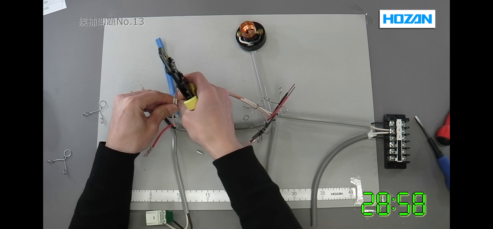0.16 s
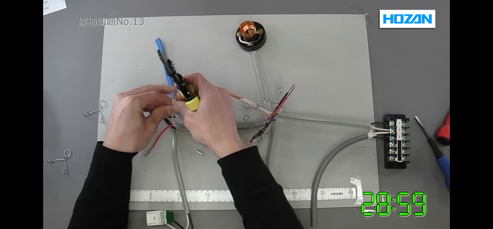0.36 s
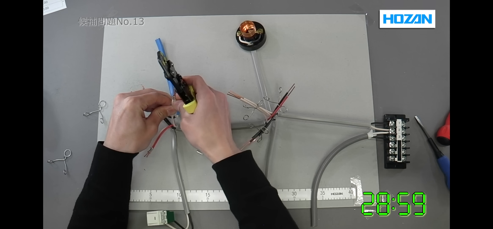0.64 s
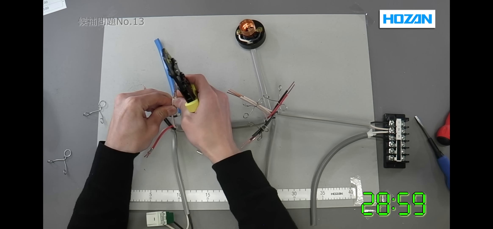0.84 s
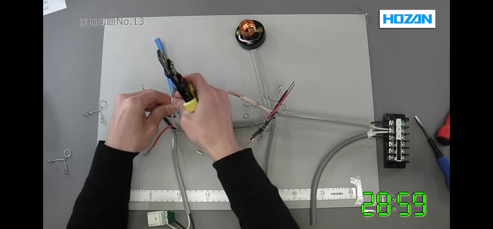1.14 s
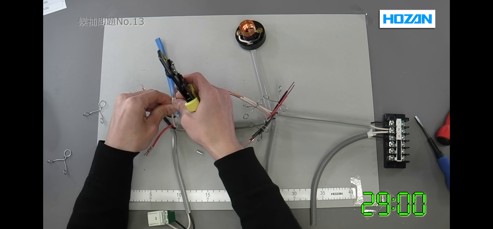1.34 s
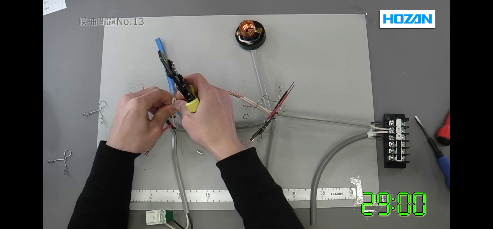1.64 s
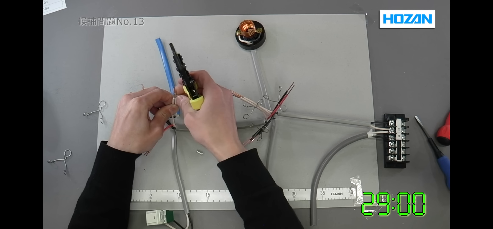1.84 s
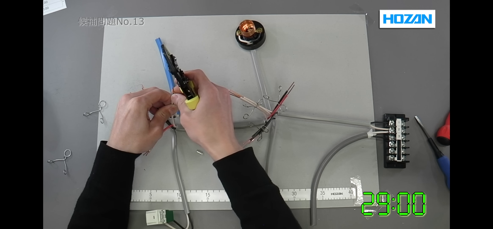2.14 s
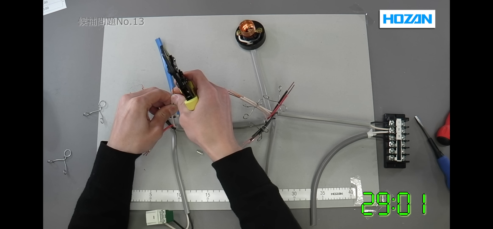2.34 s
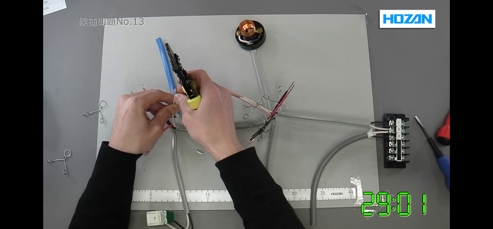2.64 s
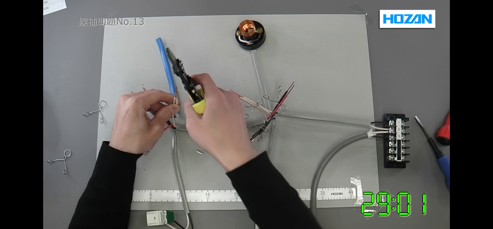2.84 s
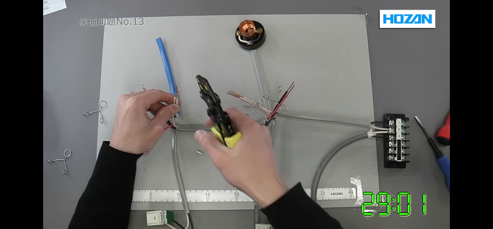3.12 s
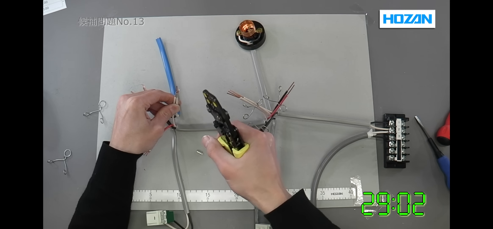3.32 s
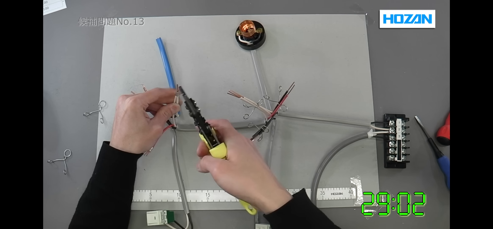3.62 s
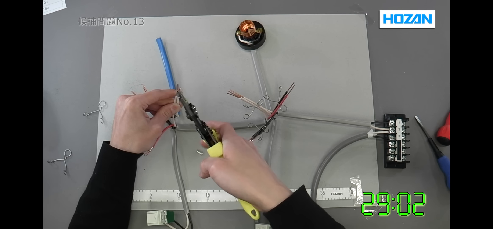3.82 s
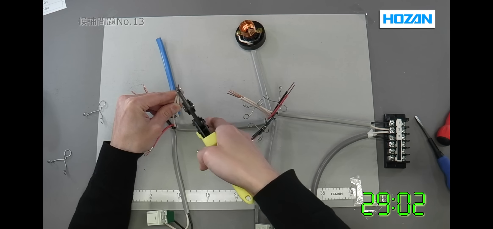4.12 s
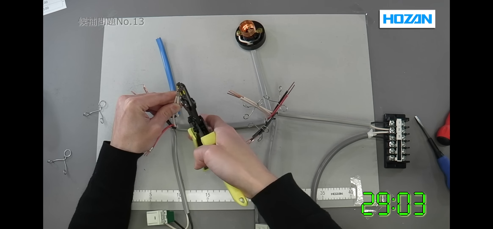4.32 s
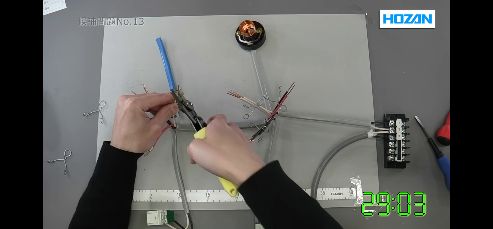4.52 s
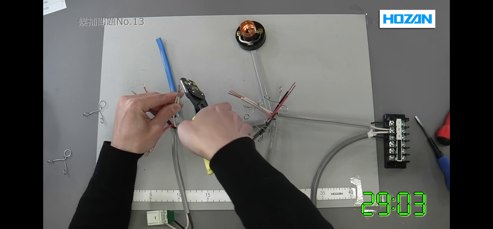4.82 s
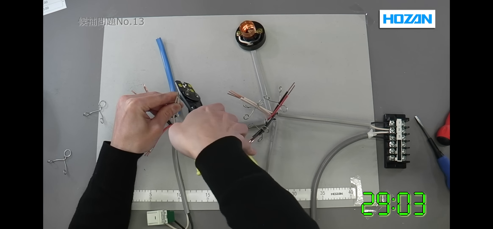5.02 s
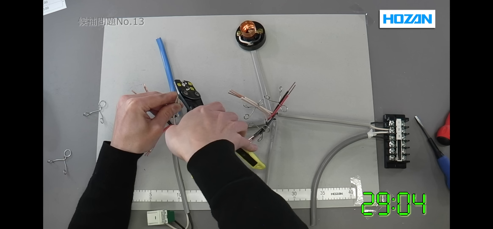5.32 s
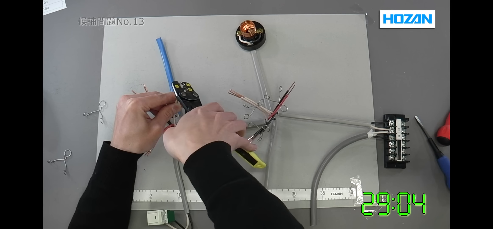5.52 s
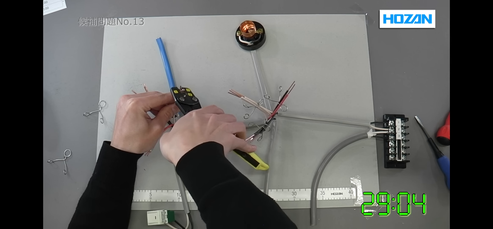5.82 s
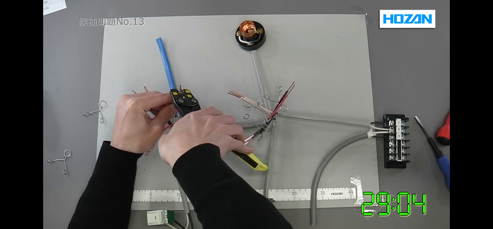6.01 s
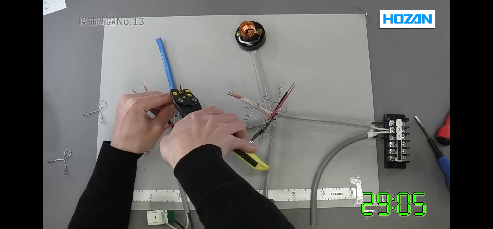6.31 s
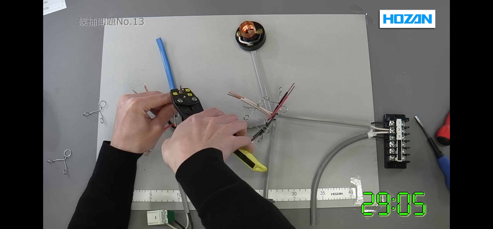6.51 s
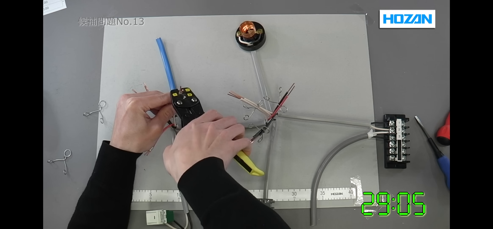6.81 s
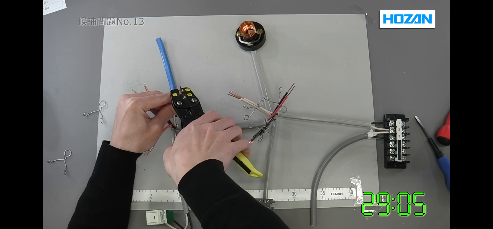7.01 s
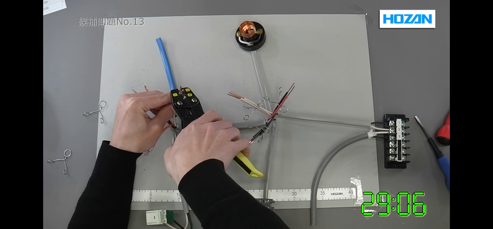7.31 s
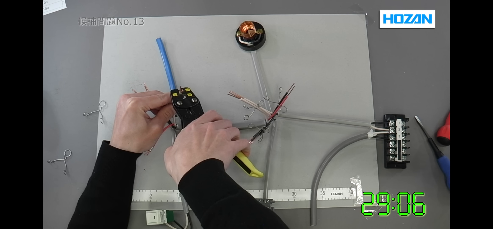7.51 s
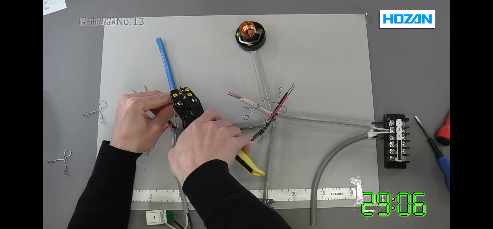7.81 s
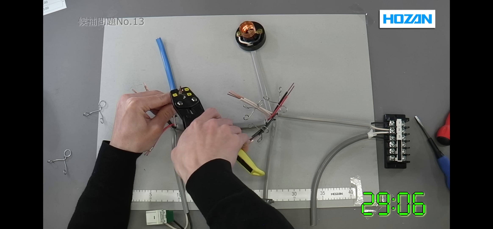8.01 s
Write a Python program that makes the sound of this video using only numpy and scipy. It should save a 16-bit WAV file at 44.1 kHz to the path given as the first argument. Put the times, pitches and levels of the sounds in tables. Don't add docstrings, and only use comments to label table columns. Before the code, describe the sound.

In a quiet room with a soft ventilation hum, a hand crimping tool's ratchet snaps loudly in brief bursts, among tiny ticks and soft desk bumps.

```python
import sys
import numpy as np
from scipy import signal
from scipy.fft import rfft, irfft
from scipy.io import wavfile
from scipy.ndimage import uniform_filter1d, minimum_filter1d

SR = 44100
rng = np.random.default_rng(int(sys.argv[2]) if len(sys.argv) > 2 else 0)


def voltage_ratio(level):
    return 10 ** (np.asarray(level, float) / 20)


def to_wav(sig):
    pcm = np.clip(np.atleast_2d(sig), -1, 1) * 32767
    pcm = np.round(pcm).astype(np.int16)
    wavfile.write(sys.argv[1], SR, pcm.T)


N = 359415

# (frequency [Hz], pawl level [dB], tick level [dB])
PARTS = [(3500, -26, -14.5), (6095, -18, -17.5), (9730, -14, -11), (13750, -17, -16)]


def add(out, s, x):
    i = int(s * SR)
    out[..., i:i + x.shape[-1]] += x[..., :N - i]


def peak(x, db):
    return x * voltage_ratio(db) / np.abs(x).max()


def walk(rate):
    k = int(SR / rate)
    steps = np.repeat(rng.standard_normal(N // k + 1), k)
    x = uniform_filter1d(uniform_filter1d(steps, k), k)[:N]
    return x / x.std()


def causal(gain):
    cepstrum = irfft(np.log(gain))
    half = len(cepstrum) // 2
    cepstrum[1:half] *= 2
    cepstrum[half + 1:] = 0
    return np.exp(rfft(cepstrum))


def diffuse(size, gain_at):
    spacing_m, sound_speed = .07, 343
    hz = np.maximum(np.fft.rfftfreq(size, 1 / SR), 1)
    alike = .997 * np.sinc(2 * hz * spacing_m / sound_speed)
    mid, side = rfft(rng.standard_normal((2, size))) * gain_at(hz)
    mid = mid * np.sqrt((1 + alike) / 2)
    side = side * np.sqrt((1 - alike) / 2)
    return irfft(np.array([mid + side, mid - side]), size)


def steel(events, part_db, room_db, slip_db, chatter_db, chatter_ms, askew):
    # (frequency [Hz], level [dB])
    steel_spectrum = [(500, -50.5), (1400, -18.5), (2200, 0), (3300, 5), (6000, 2.5), (9700, 2),
                      (13600, 4.5), (15800, -1), (20000, -22)]
    slip_ms = .33
    lead = .85
    dull_room_db = 0.3
    size, land = 1024, 128
    direct, blows = np.zeros((2, N)), np.zeros(N)
    hz = np.fft.rfftfreq(size, 1 / SR) + 1
    ms = (np.arange(size) - land) * 1000 / SR
    steel_hz, steel_db = np.transpose(steel_spectrum)
    base_db = np.interp(np.log(hz), np.log(steel_hz), steel_db)
    parts_hz = np.transpose(PARTS)[0]
    blow = 1. * (ms == 0)
    scrape = voltage_ratio(slip_db) * np.exp(ms / slip_ms)
    chatter = voltage_ratio(chatter_db) * np.exp(-ms / chatter_ms)
    shape = np.where(ms < 0, scrape, chatter)
    early = np.exp(1j * np.pi * hz * np.array([[lead], [-lead]]) / SR)
    for s, db, bright_db, ring_db in events:
        jaws_db = ring_db * (parts_hz == parts_hz[1])
        own_db = part_db + bright_db * np.log2(parts_hz / 6800) + jaws_db
        colour = causal(voltage_ratio(base_db + np.interp(np.log(hz), np.log(parts_hz), own_db)))
        contacts = voltage_ratio(2.5 * rng.exponential(size=size) - 1)
        shared, left, right = rng.standard_normal((3, size)) * contacts
        apart = rfft(shape * np.array([left, right])) * askew * hz / 10000
        pair = irfft((rfft(blow + shape * shared) * early + apart) * colour, size)
        pair = pair * voltage_ratio(db - 20) / pair.std()
        plain = irfft(rfft(blow) * colour, size)
        plain = plain * voltage_ratio(room_db - dull_room_db * bright_db) * pair.std() / plain.std()
        start = s + .0012 - land / SR
        add(direct, start, pair)
        add(blows, start, plain)
    return direct, blows


def pawl_snaps():
    # (time [s], peak [dB], brightness [dB per octave], ring of the jaws [dB])
    snap_events = [(3.21, -4.5, -1, -2.5), (3.3272, -0.5, -0.4, 3), (3.6422, -4, 3.5, -1),
                   (3.6547, -5.5, 1, -1.1), (3.6723, -8, -0.9, 0.5), (3.7044, -7, 0.5, -4.5),
                   (3.73, -2, 1.5, -1), (3.7467, -5.5, 1, -5.5), (3.7641, -4, 0, -4.5), (3.7786, -6, 0, -2),
                   (3.796, -7, -2, 2.5), (3.9368, 0.5, -3, -7), (8.1341, -2.5, 1.5, 5),
                   (3.7985, -9, 1.5, 0.6)]
    pawl_db = np.transpose(PARTS)[1]
    return steel(snap_events, pawl_db, room_db=-4.5, slip_db=-11.0, chatter_db=-3.5, chatter_ms=1.0, askew=0.44)


def small_ticks():
    # (time [s], peak [dB], brightness [dB per octave], ring of the jaws [dB])
    tick_events = [(0.156, -42, 4, 10), (0.218, -48, -9.5, -1), (0.2739, -38.5, 7, -7),
                   (0.4902, -53, 1.5, 2), (0.837, -46, -6, -9), (0.853, -40.5, -1, 10),
                   (1.5612, -45.5, 3, 7), (1.7504, -41, 6.5, -1), (1.9426, -32.5, 13.5, 6),
                   (2.4064, -48.5, -5, -20), (2.7376, -48, 2, 21), (2.767, -46.5, -1.1, 9),
                   (2.8236, -49, -9, 9), (2.909, -38.5, -1.5, -2), (2.9993, -49.5, -4, 6),
                   (3.1112, -43, -5, 6), (3.3962, -28, 13, 6), (4.0879, -31.5, -7, 1.5),
                   (4.6867, -43.5, -8.5, 4), (5.001, -41.5, -3, 9), (5.0138, -47, -9, -3),
                   (5.4351, -48.5, 0.5, 2), (5.5764, -45.5, -2, 5), (5.6705, -40.5, -4, 3.5),
                   (5.6848, -28, -3, 1), (5.8723, -25, 0, 14), (6.005, -48, -4, -2.5), (6.42, -45, 0, 2)]
    faint_times = [0.2567, 0.4, 0.4672, 0.559, 0.6144, 0.8104, 0.825, 0.884, 0.8964, 2.581, 2.651, 4.2312,
                   6.2009, 6.5844]
    faint_ticks = [(s, -53, 1, -4) for s in faint_times]
    tick_db = np.transpose(PARTS)[2]
    return steel(sorted(tick_events + faint_ticks), tick_db, room_db=-3.0, slip_db=-3.5,
                 chatter_db=6, chatter_ms=0.95, askew=0.77)


def rings():
    # (time [s], frequency [Hz], level [dB], t60 [s])
    loose_rings = [(4.089, 4330, -58, .6), (5.59, 2680, -62, .6), (5.576, 2760, -52, .1),
                   (5.576, 5400, -57, .03), (.468, 4100, -64, .025)]
    # (time [s], frequency [Hz], level [dB], t60 [s])
    jaw_clanks = [(3.2119, 4400, -22, .009), (3.2116, 11500, -19, .012), (3.3284, 14300, -17, .008),
                  (3.2119, 2000, -33, .012), (3.3288, 5800, -23, .01), (3.3286, 2230, -25, .014),
                  (3.9381, 3200, -13, .005), (3.9383, 4300, -21, .006), (8.1354, 4300, -23, .005),
                  (.1565, 1900, -46, .012)]
    out, t = np.zeros(N), np.arange(SR // 2) / SR
    for s, hz, db, t60 in loose_rings + jaw_clanks:
        decay = voltage_ratio(db - 60 * t / t60 + 3 * walk(60)[:len(t)])
        onset = np.minimum(t / .0004, 1)
        tones = np.sin(2 * np.pi * hz * t) + .45 * np.sin(2 * np.pi * 1.012 * hz * t)
        add(out, s, decay * onset * tones)
    return out


def desk():
    # (time [s], peak [dB], hardness [dB per octave], boom of the panel [dB])
    bump_events = [(0.155, -36, -1, 1), (0.22, -29.5, -9, -23), (0.83, -33.5, -4.5, 19),
                   (0.853, -43.5, 17, -5), (3.212, -42.5, 9.5, -7), (3.328, -31.5, 8, -20),
                   (3.938, -26.5, 2.5, -9.5), (5.001, -31.5, -4.5, 15), (5.014, -31, -2.2, 3),
                   (5.464, -32, -3, -5), (5.477, -36.5, -4.5, 3), (5.574, -32, -3.5, 10),
                   (5.684, -18.5, -1.5, 10.5), (5.694, -32, -5.5, 10), (5.873, -28, 4.5, 25),
                   (5.882, -31.5, -9, 22)]
    # (frequency [Hz], level [dB], t60 [s])
    desk_modes = [(105, 1, 0.15), (218.4, 0.5, 0.11), (296.6, -3.5, 0.083), (437, 3, 0.019),
                  (646.8, 0, 0.042), (830, -1, 0.0375), (1056, -1.5, 0.0281), (1415, 7.5, 0.012),
                  (1767.5, 4.5, 0.0066), (2195, 9.5, 0.0059)]
    panel_hz, panel_octaves = 250, 0.35
    out, t = np.zeros(N), np.arange(SR // 4) / SR
    hz, mode_db, t60 = np.transpose(desk_modes)[:, :, None]
    octaves = np.log2(hz / panel_hz)
    boom_shape = np.exp(-(octaves / panel_octaves) ** 2)
    polarity = (-1) ** np.arange(len(desk_modes))[:, None]
    for s, db, hard_db, boom_db in bump_events:
        level_luck, pitch_luck = rng.standard_normal((2, len(desk_modes), 1))
        start_db = mode_db + hard_db * octaves + boom_db * boom_shape + 1.5 * level_luck
        tones = np.sin(2 * np.pi * hz * (1 + 0.029 * pitch_luck) * t)
        ring = np.sum(voltage_ratio(start_db - 60 * t / t60) * tones * polarity, axis=0)
        push = 1 - np.exp(-t / 0.0003)
        add(out, s, peak(ring * push, db - 3.0))
    return out


def rustles():
    # (middle time [s], length [s], level [dB], centre frequency [Hz])
    slides = [(0.08, 0.041, -69, 11100), (0.275, 0.016, -58.5, 11600), (0.851, 0.036, -61, 11000),
              (1.749, 0.011, -66, 11000), (2.783, 0.026, -75, 8000), (3.132, 0.066, -65, 9000),
              (3.642, 0.046, -59, 10000), (4.522, 0.033, -66, 7960), (5.451, 0.032, -70.5, 11000),
              (7.878, .03, -70, 9000)]
    reach = .12
    out = np.zeros(N)
    t = np.arange(-int(reach * SR), int(reach * SR)) / SR
    for s, length, db, hz in slides:
        strength = np.repeat(rng.exponential(size=len(t) // 30 + 1), 30)[:len(t)]
        grains = rng.standard_normal(len(t)) * voltage_ratio(2.4 * strength)
        band = [0.49 * hz, min(4.8 * hz, .45 * SR)]
        grains = signal.sosfilt(signal.butter(1, band, "band", fs=SR, output="sos"), grains)
        burst = voltage_ratio(db) * grains / grains.std() * np.exp(-2 * (t / length) ** 2)
        cut = max(0, int((reach - s) * SR) + 1)
        add(out, s + t[cut], burst[cut:])
    return out


def room():
    # (delay [ms], level [dB], lag of left behind right [samples])
    early_echoes = [(2.4, -19.5, -4.5), (4.1, -20, 5), (6.6, -15, -1), (10.2, -15, 12)]
    # (frequency [Hz], t60 [s], level [dB])
    room_bands = [(201, 0.94, -49), (710, 0.43, -26.5), (1530, 0.67, -34), (3000, 0.55, -32),
                  (6000, 0.44, -34), (10000, .3, -32.5), (15114, 0.19, -30.5)]
    size = 1 << 15
    t, hz = np.arange(size) / SR, np.fft.rfftfreq(size, 1 / SR)
    paths = np.ones((2, len(hz)), complex)
    for ms, db, lag in early_echoes:
        delay = ms / 1000 + np.array([[lag], [-lag]]) / 2 / SR
        paths += voltage_ratio(db) * np.exp(-2j * np.pi * hz * delay)
    tail, centres = 0, np.log(np.array(room_bands)[:, 0])
    for k, (_, t60, db) in enumerate(room_bands):
        chosen = np.arange(len(room_bands)) == k
        band = diffuse(size, lambda f: np.sqrt(np.interp(np.log(f), centres, chosen)))
        tail = tail + voltage_ratio(db - 60 * t / t60) * band
    build_up = np.clip(t / 0.0023, 0, 1) * (1 + 1.6 * np.exp(-t / 0.0041))
    return irfft(paths, size)[:, :1024], tail * build_up


def squeals():
    # (start [s], end [s], frequency [Hz], wander [Hz], level [dB])
    far_squeals = [(2.14, 2.5, 2820, 40, -79), (2.14, 2.55, 3000, 40, -80), (2.32, 2.5, 1635, 4, -69),
                   (2.57, 3.6, 1630, 4, -68)]
    out, t = 0, np.arange(N) / SR
    for start, end, hz, width_hz, db in far_squeals:
        phase = 2 * np.pi * np.cumsum(hz + width_hz * walk(40)) / SR
        gate = np.clip(np.minimum((t - start) / .03, (end - t) / .2), 0, 1)
        fading = voltage_ratio(db + 3.5 * np.array([walk(25), walk(25)]))
        out = out + fading * gate * np.sin(phase + np.array([[0], [.8]]))
    return out


def ventilation():
    # (frequency [Hz], density [dB per Hz])
    air_spectrum = [(12, -44), (20, -9.5), (70, -11), (134, -6.5), (187, -10), (228, -4.5), (357, -14),
                    (513, -12), (759, -17), (825, -13.5), (923, -16.5), (1030, -15.5), (3070, -37),
                    (11800, -41.5), (16000, -40)]
    # (frequency [Hz], width [Hz], level [dB])
    duct_modes = [(135.1, 12, 10.5), (227.5, 19, 6), (300, 60, 3), (780, 120, 2.5)]
    air_hz, air_db = np.transpose(air_spectrum)

    def colour(f):
        resonance_db = sum(db / (1 + (2 * (f - hz) / w) ** 2) for hz, w, db in duct_modes)
        return voltage_ratio(np.interp(np.log(f), np.log(air_hz), air_db) + resonance_db)
    low = diffuse(N, lambda f: colour(f) * (f < 400)) * voltage_ratio(0.31 * walk(3.1))
    high = diffuse(N, lambda f: colour(f) * (f >= 400)) * voltage_ratio(0.12 * walk(1.4))
    air = (low + high) * voltage_ratio(np.array([[-.25], [.25]]))
    air[0] = np.roll(air[0], -4)
    return air * voltage_ratio(-50) / air.mean(axis=0).std()


def scene():
    snaps, snap_blows = pawl_snaps()
    ticks, tick_blows = small_ticks()
    skin, bumps = rustles(), desk()
    echoes, tail = room()
    near = snaps + ticks + skin + bumps + rings()
    into_room = snap_blows + tick_blows + skin + voltage_ratio(0.5) * bumps
    direct = signal.fftconvolve(near, echoes, axes=1)
    wet = signal.fftconvolve(into_room[None], tail, axes=1)
    balance = voltage_ratio(np.array([[.4], [-.4]]))
    return (direct[:, :N] + wet[:, :N]) * balance + squeals() + ventilation()


def low_pass(x):
    return signal.sosfilt(signal.butter(12, 17100, fs=SR, output="sos"), x)


def record(dry):
    ceiling, hold = 1.08, 45
    gain = minimum_filter1d(ceiling / np.maximum(np.abs(dry).max(axis=0), ceiling), size=hold)
    rounded = dry * uniform_filter1d(gain, size=hold)
    top_cut = signal.ellip(7, .5, 38, 15720, fs=SR, output="sos")
    return low_pass(signal.sosfilt(top_cut, rounded))


dry = scene()
out = record(dry)
to_wav(out)
```